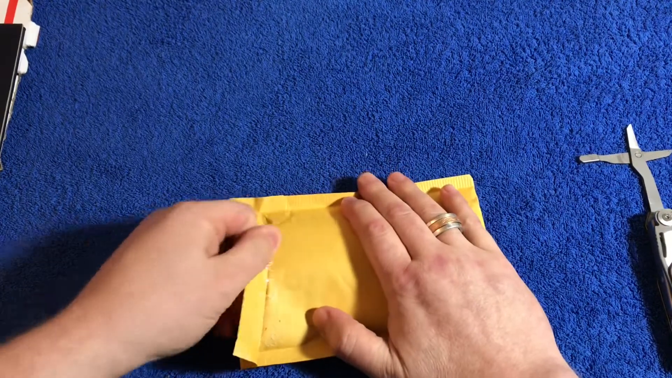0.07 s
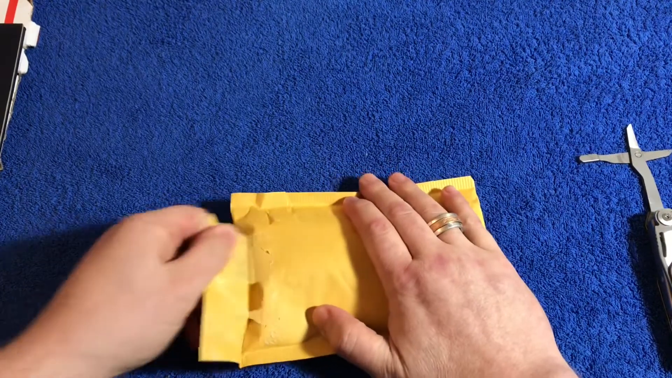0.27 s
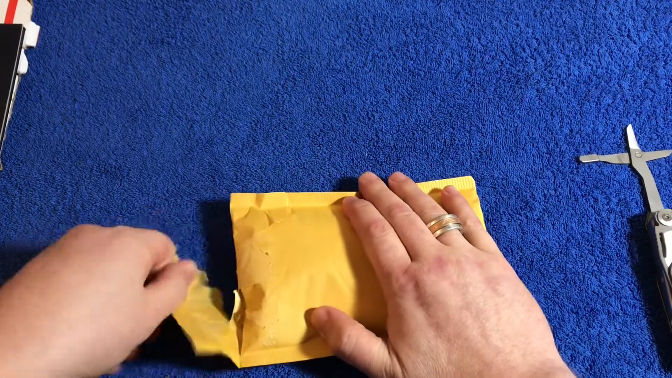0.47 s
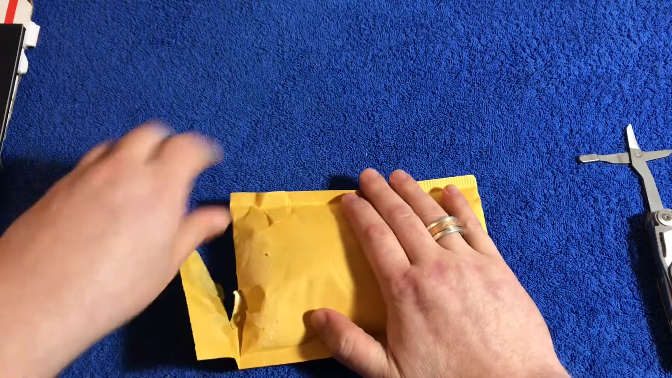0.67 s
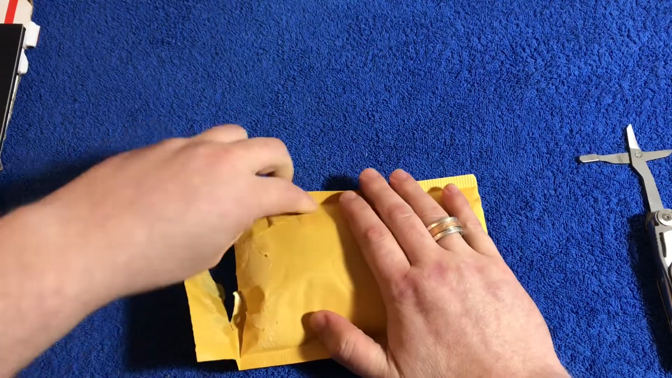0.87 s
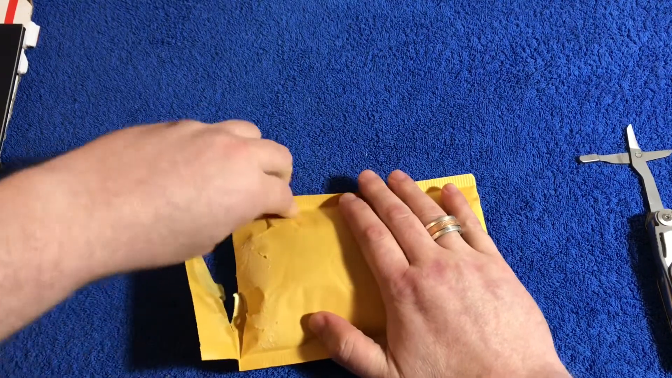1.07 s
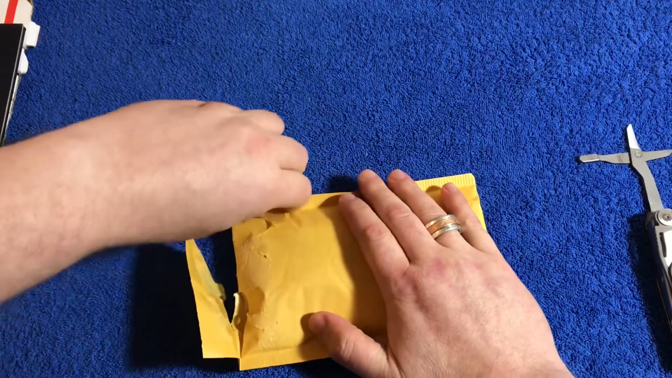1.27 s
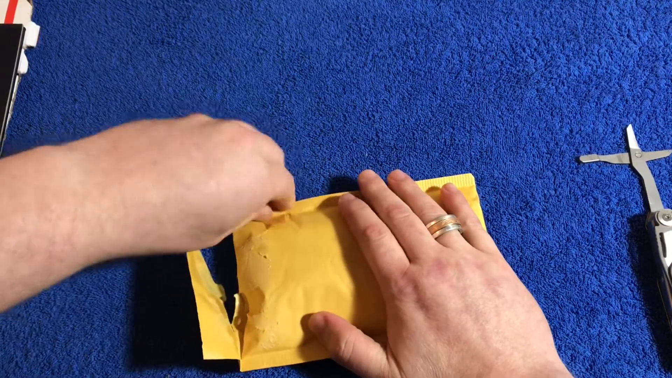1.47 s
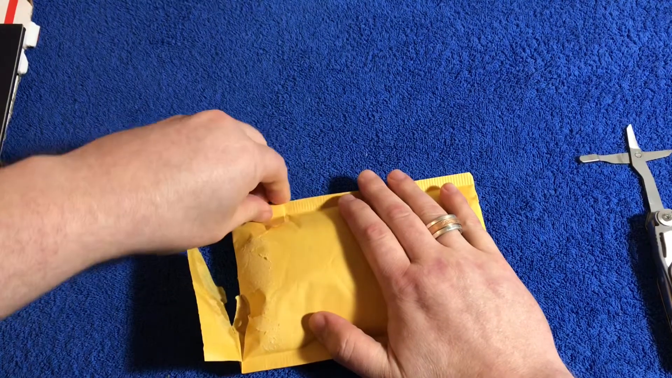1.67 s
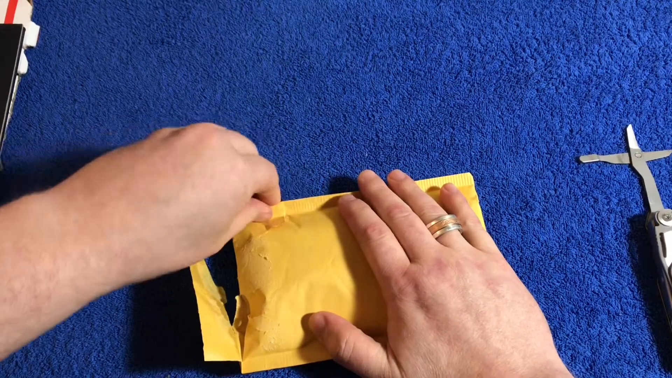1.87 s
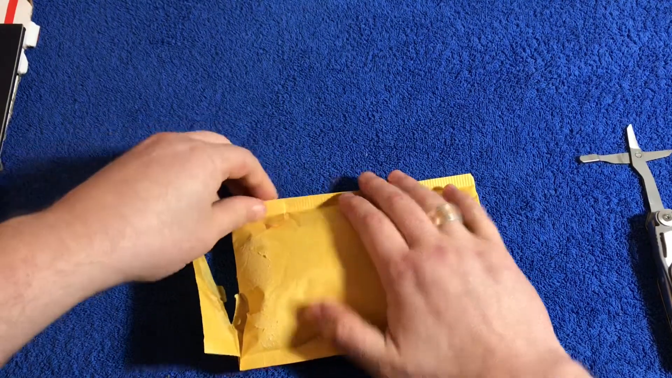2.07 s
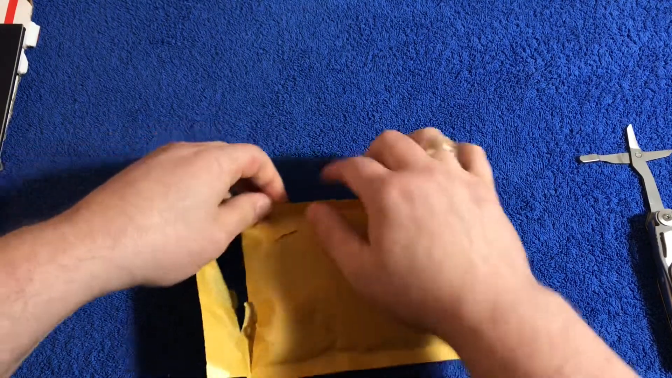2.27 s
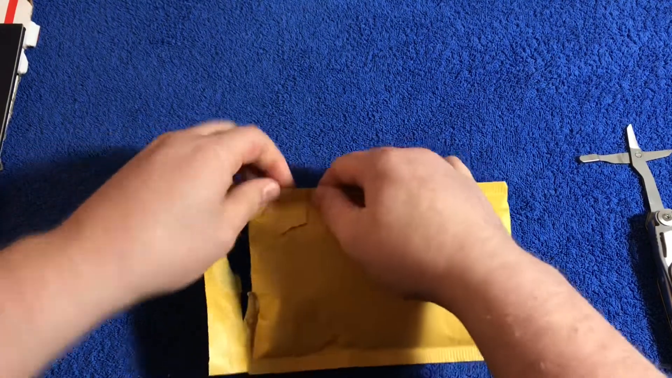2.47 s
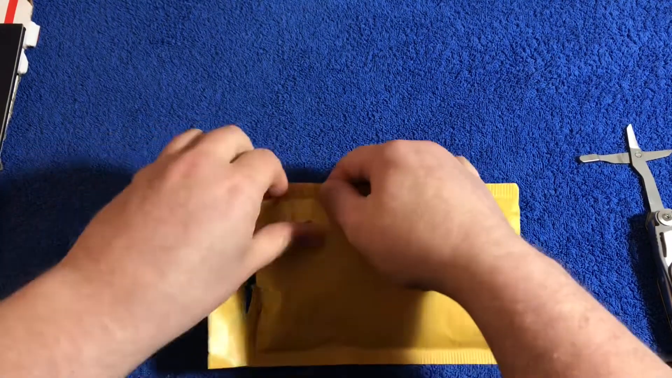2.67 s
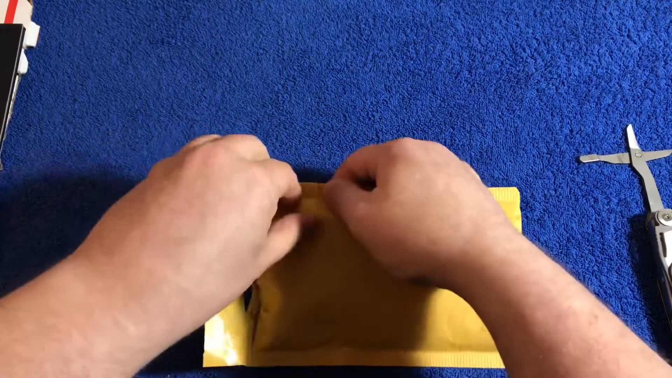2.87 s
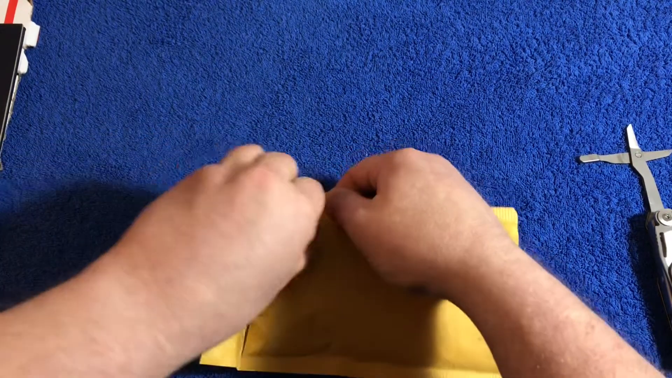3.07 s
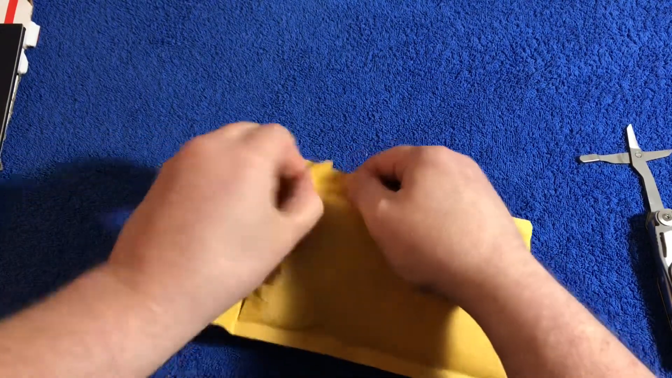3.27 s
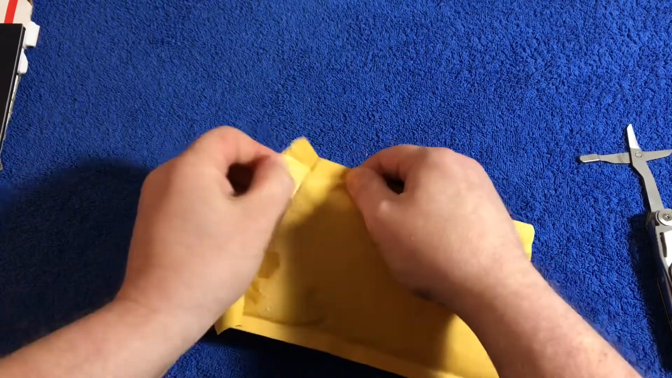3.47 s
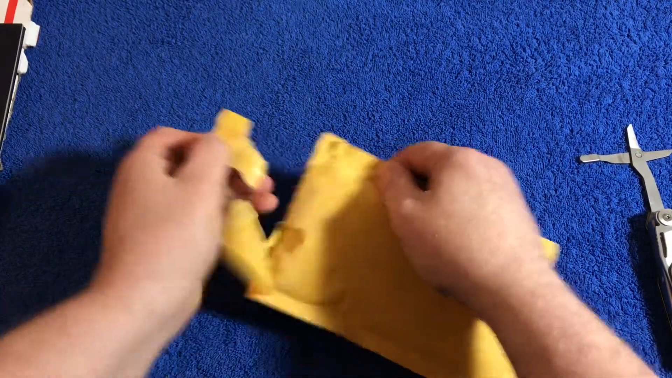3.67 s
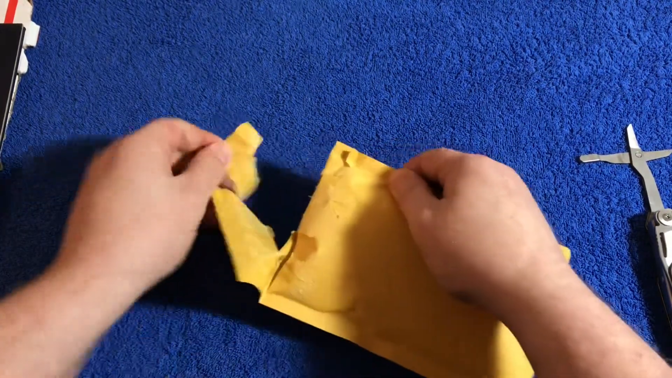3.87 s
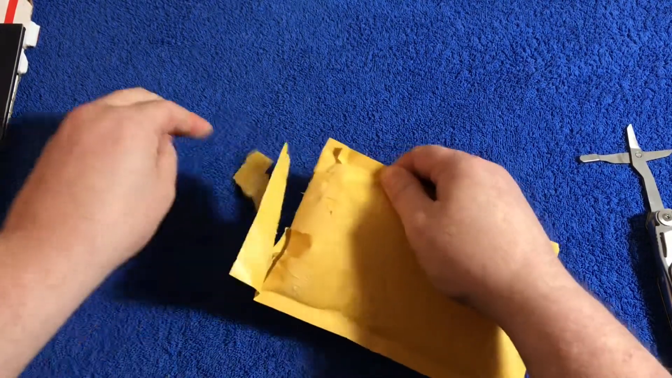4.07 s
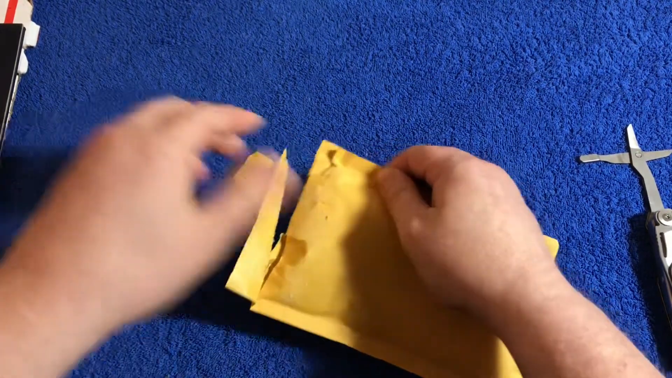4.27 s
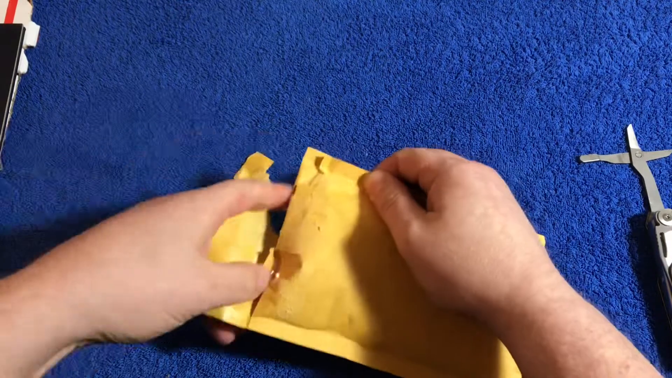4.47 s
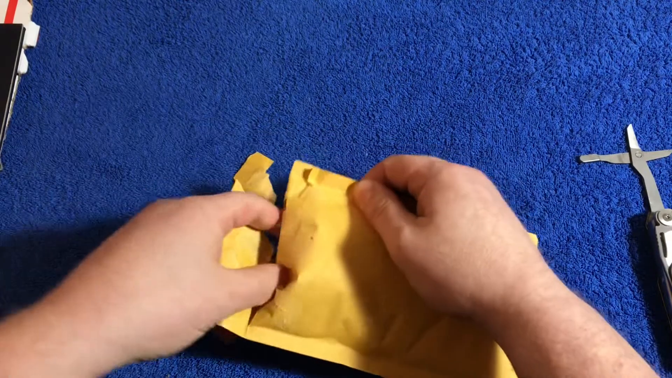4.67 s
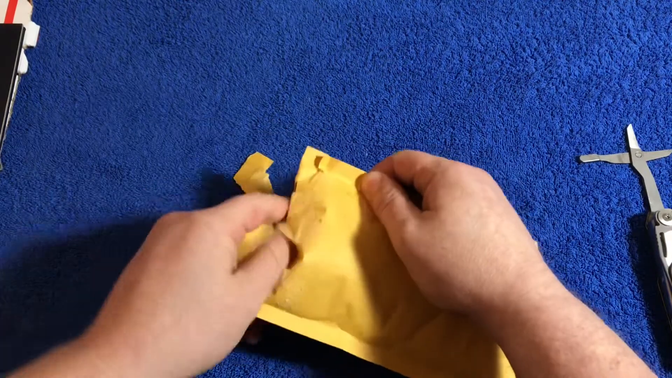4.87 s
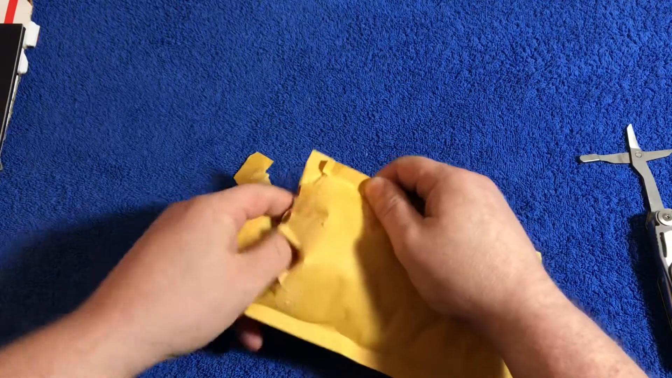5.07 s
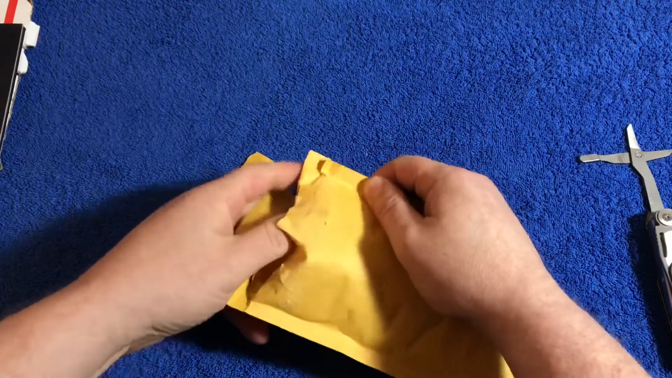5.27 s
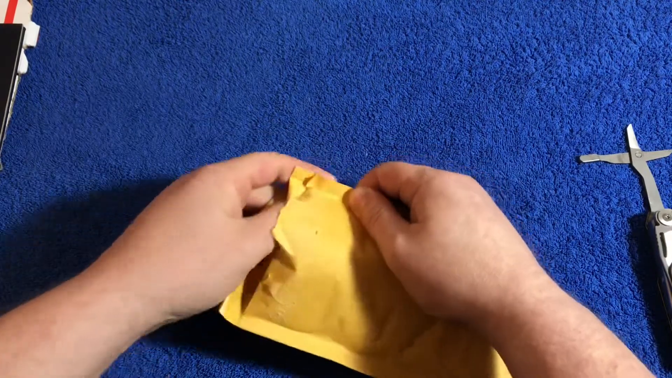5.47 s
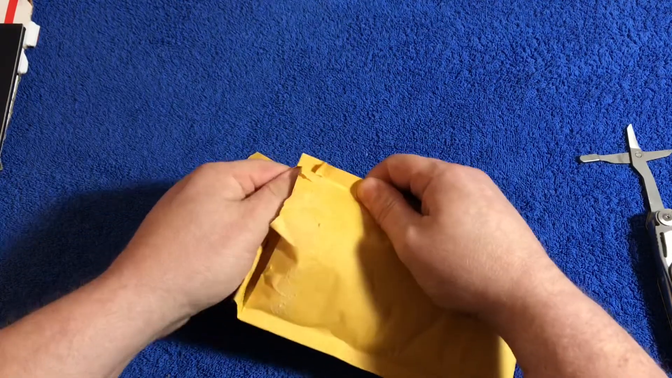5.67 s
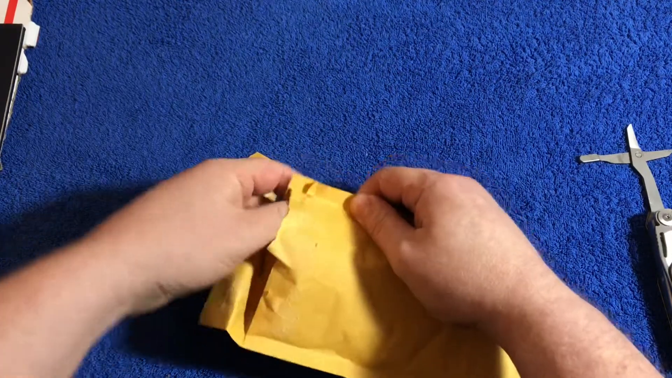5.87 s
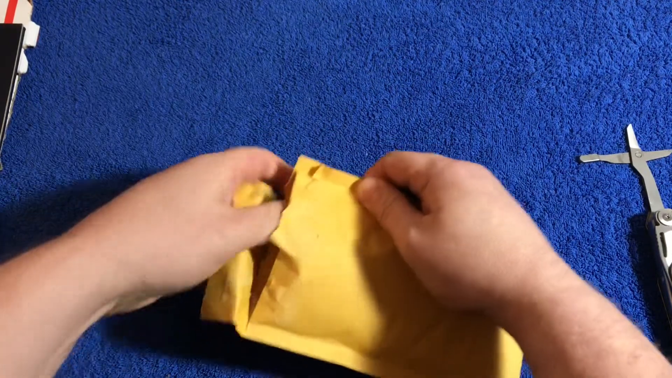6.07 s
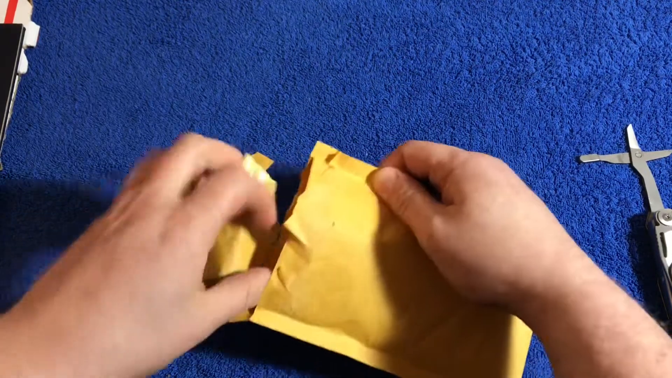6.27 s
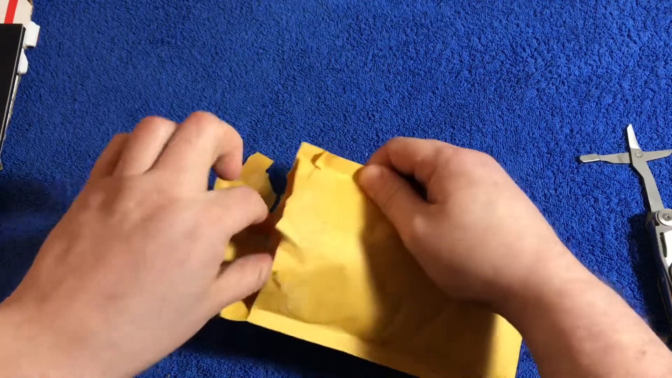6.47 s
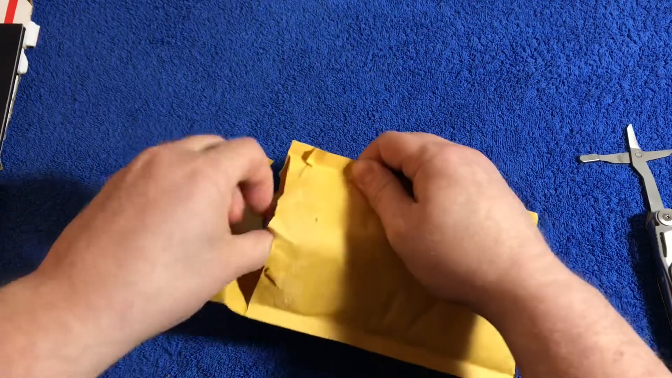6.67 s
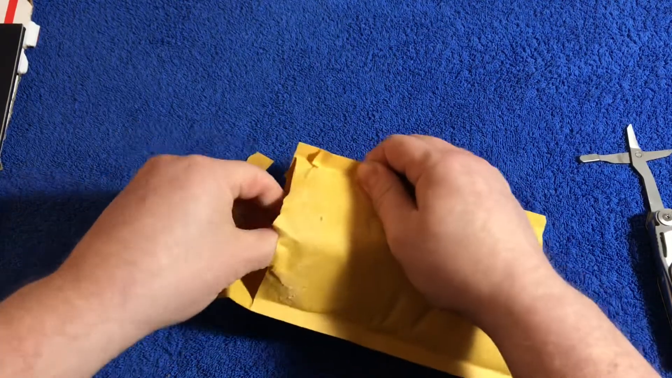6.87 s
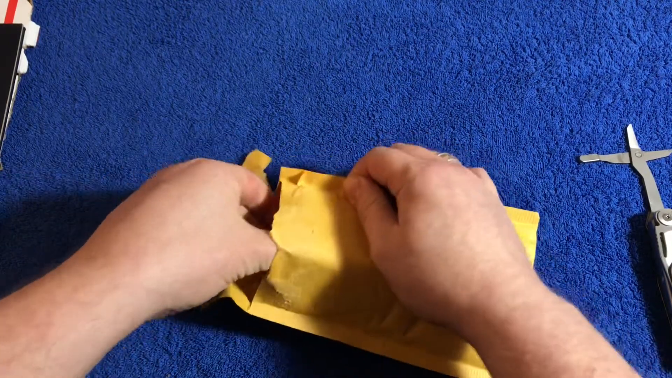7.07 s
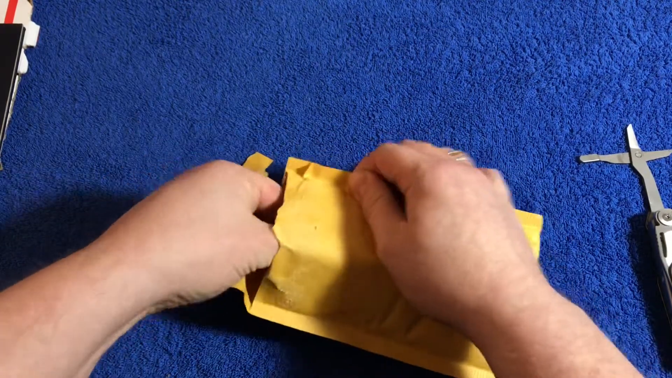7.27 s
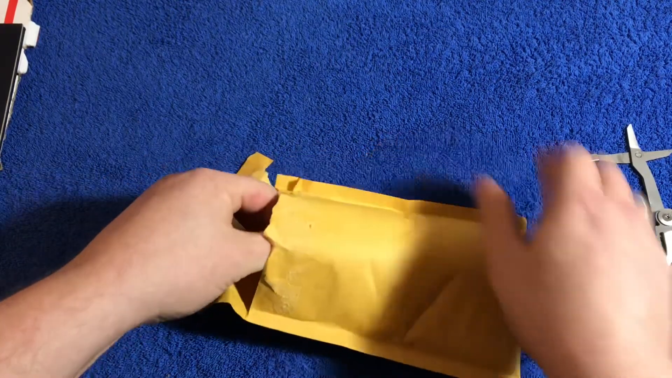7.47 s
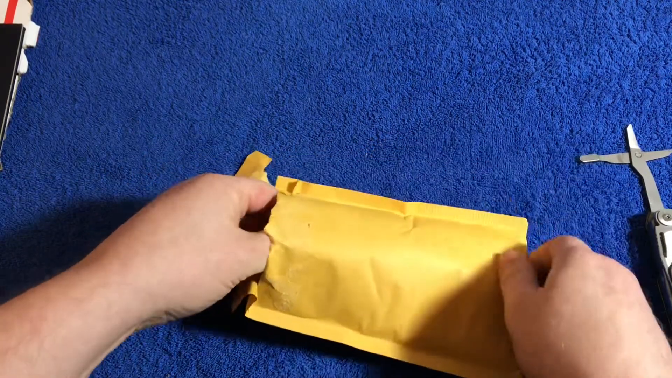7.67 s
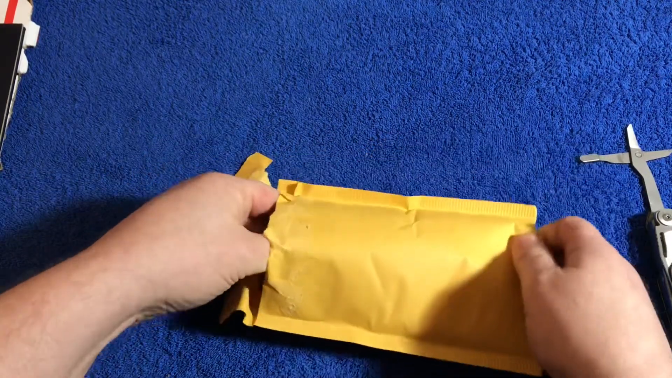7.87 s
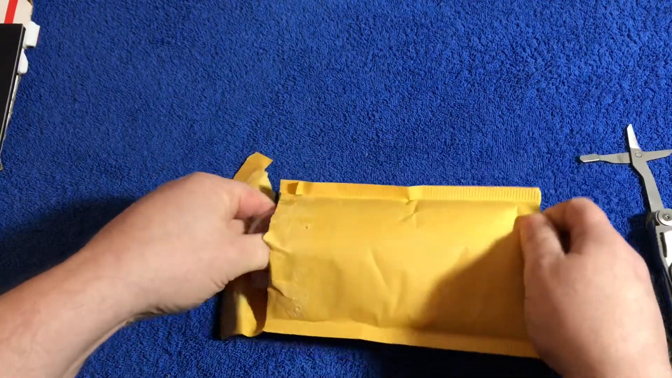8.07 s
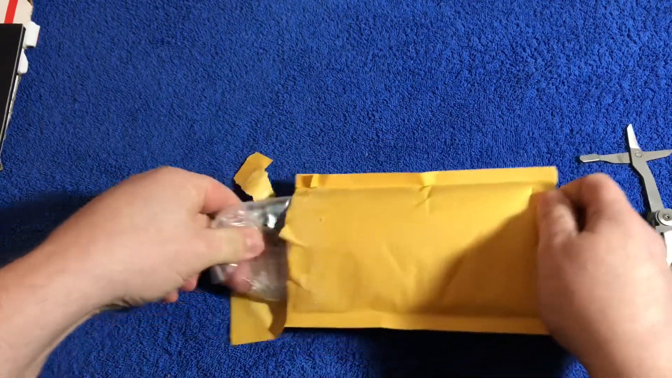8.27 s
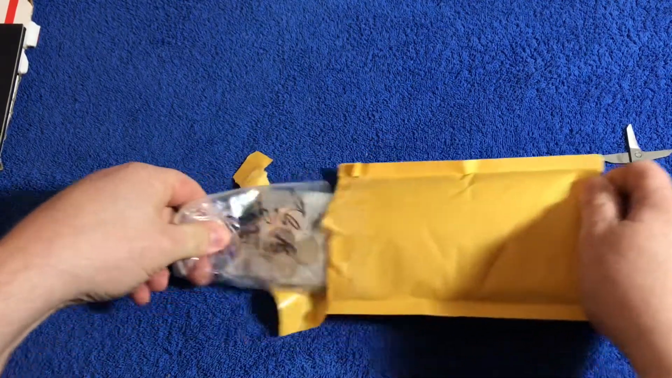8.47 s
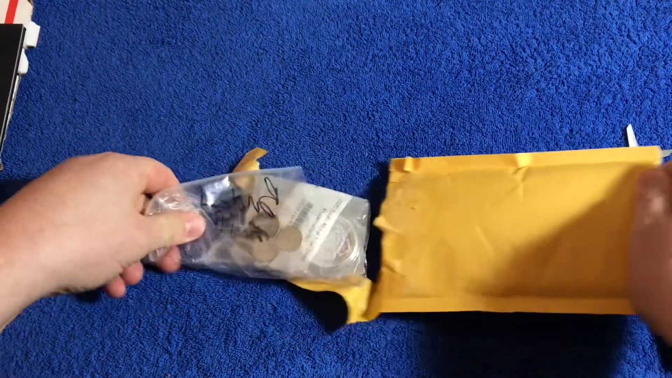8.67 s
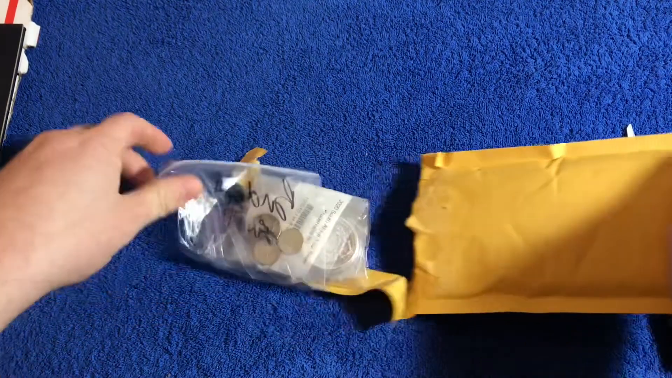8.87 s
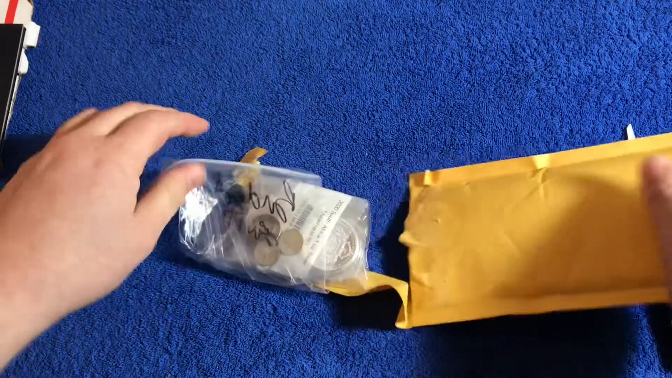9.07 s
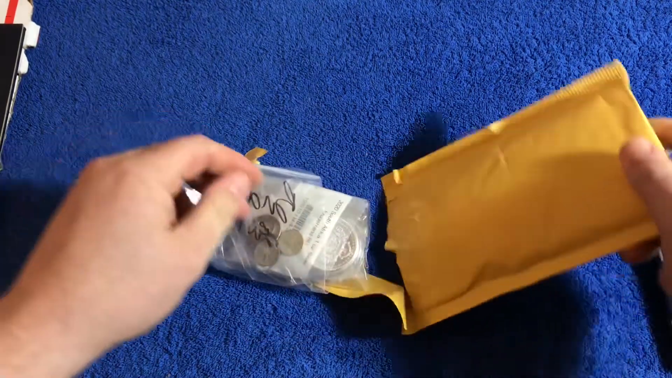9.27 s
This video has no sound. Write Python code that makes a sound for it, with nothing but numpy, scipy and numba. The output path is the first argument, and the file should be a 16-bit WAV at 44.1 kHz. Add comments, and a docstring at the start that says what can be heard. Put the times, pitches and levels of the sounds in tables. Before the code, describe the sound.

A padded envelope is opened by hand very close to a phone microphone, on a towel-covered table in a small quiet room. From 0.1 to 0.45 s a rip swells through dense crackle and stops dead, with bright snaps and a soft knock. Until 2 s only light tugs and ticks, almost silent near 1.8 s. A sharp snap at 2.3, loose rustle, louder creases at 3.2 to 3.4, then a hard, very short rip at 3.55. Near silence around 4 to 4.2. Crackling rebuilds, with a very loud snap at 4.8 and the densest bursts from 5.0 to 5.8, including a padding thump at 5.3. Softer crinkles to 7, another cluster at 7.2 to 7.8 with dull knocks and a low rumble, then sparse, low crackling as the envelope is emptied, and a last duller flurry at 9.0. Faint air, rumble and steady hum lie underneath.

```python
"""Dense paper rustle and a short rip come first: a padded envelope is torn open by hand, close under a phone.
It lies on a towel on a table in a quiet room and is emptied there. The bending sheet crackles low, parting
fibres fizz high, and both are thousands of tiny damped rings. Creases snap one by one as clusters of rings, the
envelope knocks against the table, and tugs bump the table as low noise. The room gives a short noise tail,
faint air, a low rumble and a mains hum."""
import sys
import numpy as np
from scipy import signal
from scipy.fft import rfft, irfft
from scipy.io import wavfile
from scipy.ndimage import uniform_filter1d, map_coordinates
from numba import njit

SR = 44100
rng = np.random.default_rng(int(sys.argv[2]) if len(sys.argv) > 2 else 0)


def field_ratio(decibels):
    """Amplitude ratio for a level in dB (20 dB per decade); scalars and array-likes work."""
    return 10 ** (np.asarray(decibels, dtype=float) / 20)


def output_pcm(signal):
    """Save a mono or channel-first signal as 16-bit PCM at the path in sys.argv[1].

    Samples are clipped to [-1, 1] before scaling.
    """
    pcm = np.clip(np.atleast_2d(signal).T, -1, 1) * 32767
    wavfile.write(sys.argv[1], SR, np.round(pcm).astype(np.int16))


N = 410130  # samples, about 9.3 s


def unit(x):
    """Scale to rms 1."""
    return x / np.sqrt(np.mean(x ** 2))


def curve(rows):
    """Rows (s, value) joined by straight lines."""
    return np.interp(np.arange(N) / SR, *np.transpose(rows))


def colour(x, points):
    """Causal filter through (Hz, dB) points, from the folded cepstrum of the log gain."""
    hz, db = np.transpose(points)
    grid_hz = np.maximum(np.fft.rfftfreq(8192, 1 / SR), 1)
    gain_db = np.interp(np.log(grid_hz), np.log(hz), db)
    cepstrum = irfft(np.log(field_ratio(gain_db)))
    # folding the second half onto the first makes the filter minimum phase
    cepstrum[1:4096] *= 2
    cepstrum[4097:] = 0
    impulse = irfft(np.exp(rfft(cepstrum)))
    return signal.fftconvolve(x, impulse)[:N]


def noise_band(order, low_hz, high_hz):
    """Steady noise between two frequencies, at rms 1."""
    band = signal.butter(order, (low_hz, high_hz), "bandpass", fs=SR, output="sos")
    return unit(signal.sosfilt(band, rng.standard_normal(N)))


def walk(rate):
    """Random levels held 1 / rate s and slewed twice; spread near 1."""
    k = int(SR / rate)
    held = np.repeat(rng.standard_normal(N // k + 1), k)
    return 1.73 * uniform_filter1d(uniform_filter1d(held, k), k)[:N]


@njit
def rings(s, hz, t60, size):
    """Each row is a damped ring that starts at once and is cut after its t60."""
    out = np.zeros(N)
    for k in range(len(s)):
        turn = np.exp(2j * np.pi * hz[k] / SR - np.log(1000) / (t60[k] * SR))
        z, start = size[k] + 0j, int(s[k] * SR)
        for j in range(start, min(N, start + int(t60[k] * SR))):
            out[j] += z.imag
            z *= turn
    return out


def ring_grid(*columns):
    """Sum the rings of equally shaped 2-D arrays: start, pitch, t60, size."""
    return rings(*(np.ascontiguousarray(c).ravel() for c in columns))


def crackle(count, lo_hz, hi_hz, cycles, spread_db, flicker_db, flicker_rate):
    """Tiny facets of every size let go at random, in flurries; spread_db sets how sizes differ."""
    when, pitch, luck = rng.random((count, 3)).T
    hz = lo_hz * (hi_hz / lo_hz) ** pitch
    # small facets ring briefly, so they start harder
    size = hz * field_ratio(-spread_db * np.log(1 - .99 * luck))
    # the strain wanders over the sheet: patches of like facets are busy for a moment, then others
    patches = rng.standard_normal((300, 6))
    size = size * field_ratio(3 * map_coordinates(patches, [when * 299, pitch * 5], order=1))
    grains = unit(rings(when * N / SR, hz, cycles / hz, size))
    return grains * field_ratio(flicker_db * walk(flicker_rate))


def effort(layer):
    """Drive in dB of the sheet (0) or the fibres (1): the steady grip plus every tug, swelling and letting go."""
    # steady grip on the envelope, before each layer's own trim: start_s, flexing_db, rubbing_db
    grip = np.array([(0, -38.5, -35.5), (.62, -54.5, -72), (1.3, -53, -64.5), (1.8, -70, -81),
                     (2.05, -49.5, -50), (2.5, -52.5, -74), (2.75, -52, -48.5), (3.4, -53, -59),
                     (3.749, -47, -52), (4.1, -73.5, -70), (4.46, -60, -77), (4.7, -50.5, -70),
                     (5.2, -45.5, -42), (5.9, -51, -55), (6.45, -47.5, -49), (6.615, -46.5, -52.5),
                     (6.665, -55, -64), (6.685, -55.5, -53.5), (7.1, -45.5, -49), (7.47, -54, -57.5),
                     (7.6, -45.5, -53.5), (8.9, -49, -54.5), (9.3, -51, -58)])
    # tugs, rips and squeezes, before each layer's own trim:
    # greatest_force_s, length_s, flexing_db, parting_db
    tugs = np.array([(0.176, 0.079, -33, -27), (0.242, 0.11, -49, -31), (0.31, 0.048, -38, -27.5),
                     (0.4, 0.025, -27, -26.5), (0.441, 0.039, -31.5, -38.5), (0.788, 0.035, -41, -37),
                     (0.989, 0.064, -51, -48.5), (1.437, 0.055, -55, -49.5), (1.678, 0.032, -52.5, -47),
                     (1.92, 0.053, -39.5, -46.5), (2.427, 0.056, -45, -53.5), (2.588, 0.031, -42, -55),
                     (2.996, 0.047, -40.5, -47), (3.258, 0.17, -39.5, -43), (3.402, 0.11, -52, -37),
                     (3.554, 0.031, -26, -21.5), (3.585, 0.017, -23, -21.5), (4.301, 0.0083, -44.5, -45),
                     (4.361, 0.054, -37, -40.5), (4.58, 0.19, -44, -43.5), (4.833, 0.054, -28.5, -31.5),
                     (4.988, 0.036, -30.5, -38.5), (5.217, 0.015, -25, -28), (5.378, 0.02, -25, -36.5),
                     (5.572, 0.048, -31.5, -33), (5.767, 0.047, -41.5, -42.5), (6.08, 0.17, -48, -48),
                     (6.89, 0.12, -41.5, -52.5), (7.27, 0.062, -36.5, -45.5), (7.632, 0.15, -40, -56),
                     (8.037, 0.13, -50, -47.5), (8.258, 0.088, -43, -48), (9.02, 0.11, -44.5, -67)])
    # limiting slopes for (sheet, fibres), dB per tug length
    rise_db, fall_db = (36.5, 24.5), (15.5, 15)
    hold = 0.34  # share of a tug's length over which the force stays near its top
    t = np.arange(0, N, 64) / SR
    x = (t - tugs[:, :1]) / tugs[:, 1:2]
    away = np.hypot(x, hold) - hold
    tug_db = tugs[:, 2 + layer, None] - np.where(x < 0, rise_db[layer], fall_db[layer]) * away
    grip_db = np.interp(t, grip[:, 0], grip[:, 1 + layer])
    power = field_ratio(2 * grip_db) + field_ratio(2 * tug_db).sum(axis=0)
    return np.interp(np.arange(N) / SR, t, 10 * np.log10(power))


def room():
    """Faint room air, a deep rumble that swells now and then, and a steady mains hum."""
    # spectrum of the air, shape only: pitch_hz, relative_level_db (per Hz)
    air_shape = [(60, -26.5), (90, -9), (260, -8.5), (430, -17.5), (1120, -24.5), (15400, -50.5)]
    # rumble rms over time: start_s, level_db
    rumble_level = [(0, -62.5), (1.3, -63), (4.5, -68), (6.5, -65), (7.55, -55.5), (7.8, -62.5), (9.3, -65)]
    air_db, hum_hz, hum_db = -63.5, 118.2, -66  # rms levels
    air = unit(colour(rng.standard_normal(N), air_shape)) * field_ratio(air_db)
    rumble = noise_band(2, 42, 66) * field_ratio(curve(rumble_level))
    hum = np.sqrt(2) * field_ratio(hum_db) * np.sin(2 * np.pi * hum_hz * np.arange(N) / SR)
    return air + rumble + hum


def walls(x):
    """Diffuse return of a small furnished room: a dull, short tail of decaying noise."""
    t60_s, tail_db, top_hz = .35, -16.5, 4840
    t = np.arange(int(.4 * SR)) / SR
    onset = np.minimum(t / 0.00024, 1)
    tail = rng.standard_normal(len(t)) * field_ratio(-60 * t / t60_s) * onset
    tail = signal.lfilter(*signal.butter(1, top_hz, fs=SR), tail)
    return field_ratio(tail_db) * signal.fftconvolve(x, tail / np.linalg.norm(tail))[:N]


def thuds():
    """Each tug also pushes the table through the towel: a dull bump that follows the flexing."""
    return noise_band(2, 70, 220) * field_ratio(effort(0) - 23.0 + 1.7 * walk(11))


def knocks():
    """The envelope knocks against the table now and then: a few damped thumps, the towel swallowing the deepest
    part."""
    # knocks against the table: start_s, level_db (of each thump, before the towel), pitch_hz (centre)
    knock_rows = [(0.41, -25, 298), (5.315, -18, 415.8), (5.583, -31, 323), (6.448, -30, 500),
                  (7.254, -27.5, 242), (7.516, -28, 900)]
    cycles, longest_lag_s, spread_oct = 3.2, 0.0218, 0.74
    s, level_db, hz = np.transpose(knock_rows)[:, :, None]
    lag, off = np.moveaxis(rng.random((len(knock_rows), 4, 2)), 2, 0)
    thump_hz = hz * 2 ** (spread_oct * (off - .5))
    thump_s = s + longest_lag_s * lag ** 2
    thumps = ring_grid(thump_s, thump_hz, cycles / thump_hz, field_ratio(level_db + 0 * lag))
    return signal.lfilter(*signal.butter(2, 190, "highpass", fs=SR), thumps)


def rips():
    """The flap rips along its edge, ever harder until it gives: a mid-band crackle that stops dead."""
    # running tears: start_s, end_s, final_level_db (before flicker and paper colour)
    tears = [(0.105, 0.357, -20.5), (3.54, 3.593, -28)]
    swell_db, stop_s = 18, 0.0066  # rise over a tear, time constant of its stop
    t, gain = np.arange(N) / SR, 0
    for start, end, db in tears:
        swell = field_ratio(db - swell_db * (end - t) / (end - start)) * (t > start)
        stop = field_ratio(db) * np.exp(-np.abs(t - end) / stop_s)
        gain = gain + np.where(t < end, swell, stop)
    return gain * crackle(count=15000, lo_hz=1030, hi_hz=2630, cycles=17.0, spread_db=-2.0,
                          flicker_db=3.0, flicker_rate=100)


def rustle():
    """The bending sheet gives the low crackle, the parting and rubbing fibres the high fizz."""
    flex = crackle(count=30000, lo_hz=216, hi_hz=4390, cycles=8.0, spread_db=3.0,
                   flicker_db=1.5, flicker_rate=75)
    fibre = crackle(count=70000, lo_hz=4210, hi_hz=17400, cycles=2.8, spread_db=3.0,
                    flicker_db=2.5, flicker_rate=97)
    return flex * field_ratio(effort(0) + 4.5) + fibre * field_ratio(effort(1) + 7.5)


def small_snaps(count):
    """Lesser creases give way at random, harder the more the sheet is flexed; rows for snaps()."""
    when, pitch, luck = rng.random((count, 3)).T
    s = when * N / SR
    level_db = effort(0)[(s * SR).astype(int)] + 1.5 + 14 * luck ** 2
    return np.transpose([s, level_db, 1000 * 9.0 ** pitch])


def snaps(rows):
    """A crease flips, then settles in weaker steps: facet rings, splinters spread wide, the envelope answers."""
    # modes of the padded envelope: pitch_hz (centre), relative_level_db, t60_s
    body_modes = [(335, -9.5, 0.023), (620, -6.5, 0.016), (1025, -13, 0.02)]
    # the emptied envelope turns away and its splinters lose their top above the facet's pitch
    away_s, away_db_per_oct = 8.9, 9.5
    s, level_db, hz = np.transpose(rows)[:, :, None]
    # per snap: 8 facet rings, then 16 splinters
    lag, off, luck = np.moveaxis(rng.random((len(rows), 24, 3)), 2, 0)
    first = lag[:, :8].min(axis=1, keepdims=True)
    lag = np.hstack([np.sort(lag[:, :8]) - first, lag[:, 8:]])
    at = s + .006 * lag ** 2
    size = field_ratio(level_db + 0.3 - 12.3 * lag - 2.64 * luck) * np.sign(luck - .5)

    facet_hz = hz * 2 ** (.45 * (off[:, :8] - .5))
    facet = ring_grid(at[:, :8], facet_hz, 10.6 / facet_hz, field_ratio(3.0) * size[:, :8])

    # splinters cover all sizes evenly, strongest near the facet's own
    wide_hz = 700 * 24 ** ((np.arange(16) + off[:, 8:]) / 16)
    octaves = np.log2(wide_hz / hz)
    turned_db = away_db_per_oct * (s > away_s) * np.maximum(octaves, 0)
    near = field_ratio(-5.5 * np.abs(octaves) - turned_db)
    wide_size = field_ratio(3.5) * size[:, 8:] * near * (wide_hz / 1000) ** .6
    splinters = ring_grid(at[:, 8:], wide_hz, 9.0 / wide_hz, wide_size)

    # the grip shifts the body's modes; large, low facets shake it hardest
    mode_hz, mode_db, t60 = np.transpose(body_modes)
    shift = rng.standard_normal((len(rows), len(body_modes)))
    shake = field_ratio(level_db + mode_db - 2.0 * np.log2(hz / 1000))
    body = ring_grid(s + 0.00171 + 0 * shift, mode_hz * (1 + 0.13 * shift), t60 + 0 * shift, shake)
    return facet + splinters + body


def scene():
    """Paper near the microphone, its echo, the table, and the room."""
    # creases that snap: start_s, level_db (before ring gains and paper colour), pitch_hz (freed facet)
    crease_rows = [(0.1634, -10.5, 5560), (0.178, -15.5, 1590), (0.337, -14, 2030), (0.349, -15, 2020),
                   (0.382, -23, 2820), (0.3934, -11.5, 9200), (0.411, -13, 2400), (0.5445, -25, 4750),
                   (0.7525, -29, 2530), (0.7924, -23.5, 1730), (0.8807, -22, 2870), (1.1501, -27, 1890),
                   (1.226, -22, 1510), (2.109, -20, 1500), (2.3155, -12.5, 4550), (2.58, -26, 1700),
                   (2.628, -28, 2030), (2.7221, -26, 1830), (2.8548, -28, 2250), (2.9101, -23, 5500),
                   (3.2055, -8.5, 4870), (3.2798, -15, 3870), (3.3012, -16.5, 1740), (3.4425, -13, 6350),
                   (3.936, -36.5, 2270), (3.9488, -32, 6430), (4.037, -45.5, 2560), (4.336, -26, 1810),
                   (4.379, -28, 4010), (4.5808, -22.5, 1780), (4.6317, -22, 1800), (4.7495, -21.5, 6890),
                   (4.7574, -14.5, 5900), (4.7804, -17.5, 1760), (4.8188, -4.5, 6800), (4.9834, -11.5, 880),
                   (5.2648, -14.5, 3330), (5.2743, -17, 3600), (5.3042, -12, 2480), (5.3182, -10.5, 1710),
                   (5.4129, -12.5, 8000), (5.4808, -19, 4900), (5.5387, -10.5, 5440), (5.5641, -9.5, 8300),
                   (5.6085, -14, 5550), (5.6324, -16, 5440), (5.7612, -19.5, 6600), (5.7776, -25, 1520),
                   (5.782, -26, 4700), (6.001, -33.5, 2490), (6.1024, -18, 3900), (6.1225, -22, 1680),
                   (6.219, -36, 5220), (6.3354, -23, 1370), (6.5798, -23.5, 4450), (6.682, -26.5, 1740),
                   (6.692, -23, 4260), (6.8487, -22.5, 1560), (6.8841, -22.5, 1000), (6.899, -22.5, 4500),
                   (6.9889, -24, 1310), (7.1305, -21.5, 5100), (7.148, -28.5, 1600), (7.158, -20.5, 1670),
                   (7.3186, -18, 5170), (7.3291, -12, 3250), (7.3426, -16.5, 2030), (7.358, -17.5, 990),
                   (7.5157, -12, 2730), (7.6149, -24, 2000), (7.663, -20.5, 1860), (7.6768, -15.5, 1600),
                   (7.7127, -15, 1460), (7.729, -21, 2310), (7.7451, -25, 6000), (7.7596, -19, 6450),
                   (8.2425, -21.5, 1220), (8.265, -28, 1090), (8.342, -31, 1760), (8.368, -26.5, 3480),
                   (8.399, -22.5, 990), (8.4321, -16.5, 3800), (8.491, -23, 6160), (8.5857, -27.5, 8900),
                   (8.7429, -23, 1980), (8.9853, -24, 980), (9.0123, -19.5, 1200), (9.0372, -15.5, 4030)]
    # response of sheet and microphone together: pitch_hz, gain_db
    paper_response = [(90, -71), (150, -26), (345, -11.5), (820, -8.5), (970, -5), (1600, -4), (4800, -6),
                      (6200, -1.5), (7600, -6.5), (9200, -4), (10500, -7), (11500, -4)]
    creases = snaps(crease_rows) + snaps(small_snaps(count=900))
    paper = colour(rustle() + rips() + creases, paper_response) + knocks()
    mix = paper + walls(paper) + thuds() + room()
    return mix[None]


def low_pass(x):
    """Removes everything above the highest recorded frequency."""
    return signal.sosfilt(signal.butter(12, 16990, fs=SR, output="sos"), x)


def record(dry):
    """A steep low-pass limits the band of the finished mix to 15.9 kHz."""
    band_limit = signal.ellip(10, .2, 60, 15900, fs=SR, output="sos")
    finished = signal.sosfilt(band_limit, dry)
    return low_pass(finished)


dry = scene()
out = record(dry)
output_pcm(out)
```